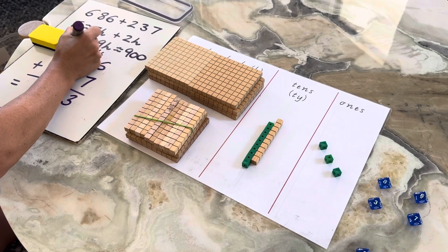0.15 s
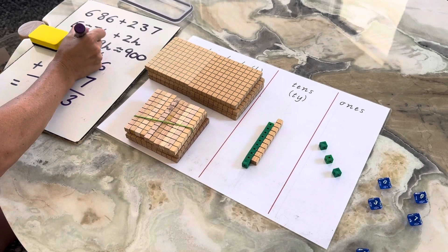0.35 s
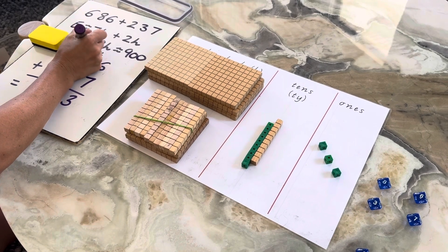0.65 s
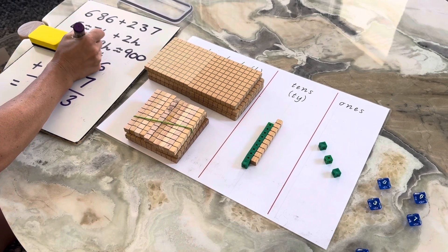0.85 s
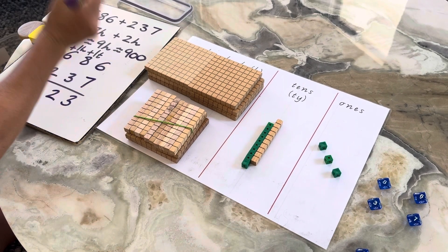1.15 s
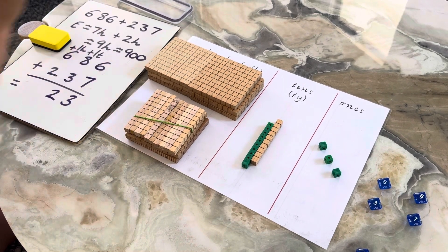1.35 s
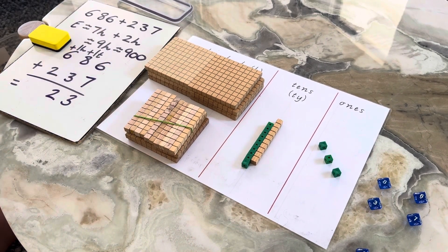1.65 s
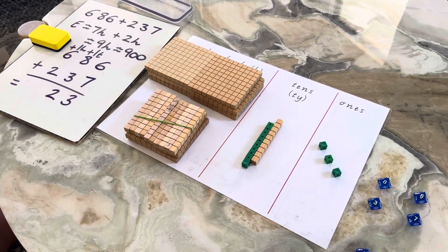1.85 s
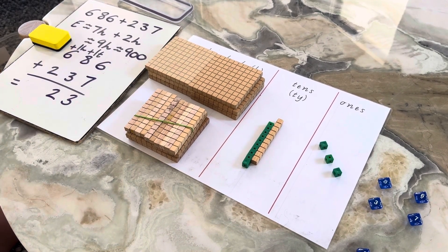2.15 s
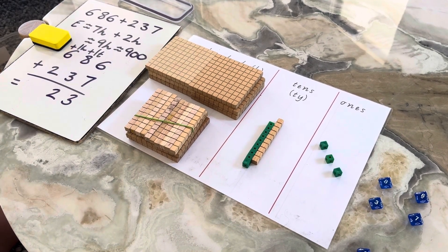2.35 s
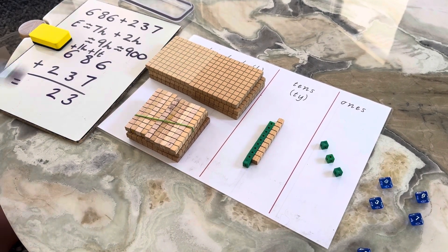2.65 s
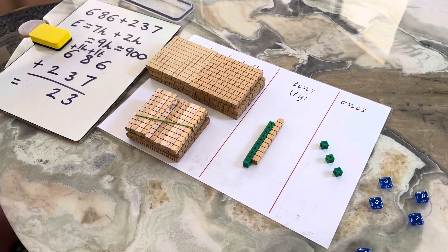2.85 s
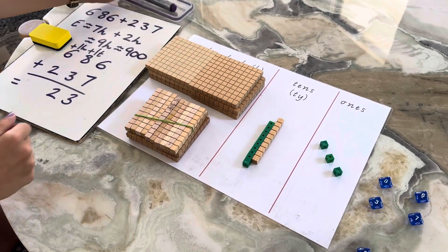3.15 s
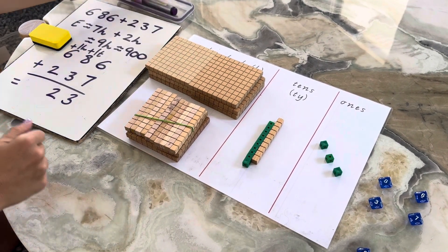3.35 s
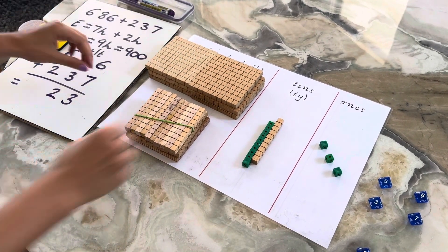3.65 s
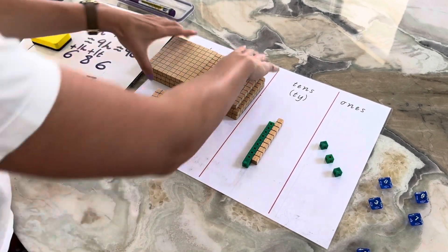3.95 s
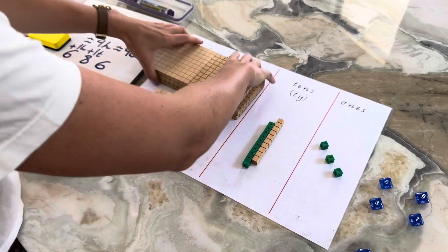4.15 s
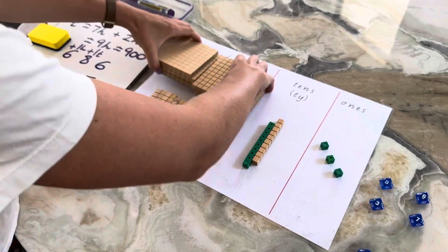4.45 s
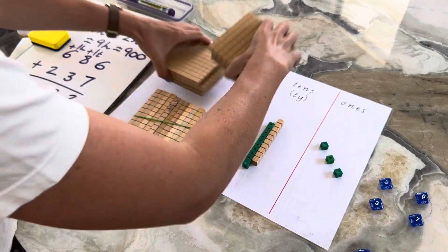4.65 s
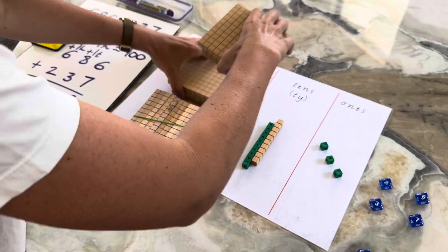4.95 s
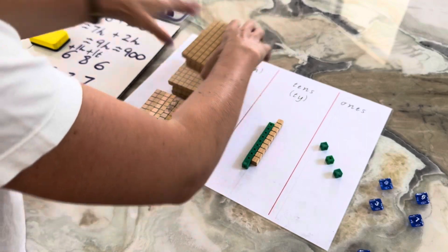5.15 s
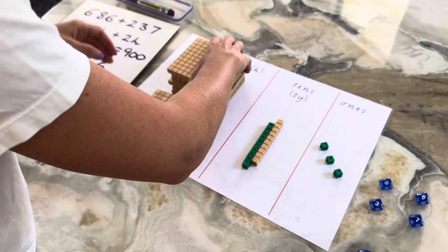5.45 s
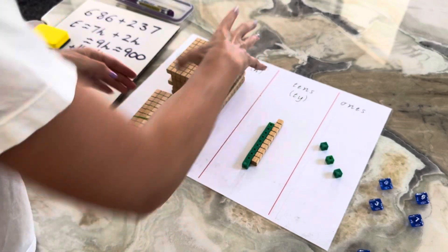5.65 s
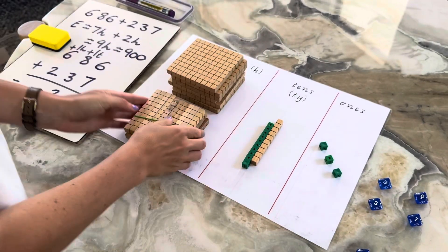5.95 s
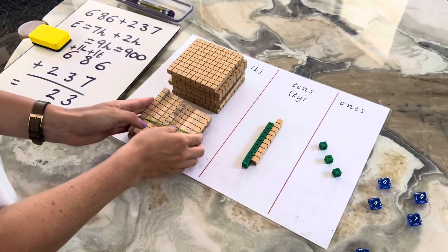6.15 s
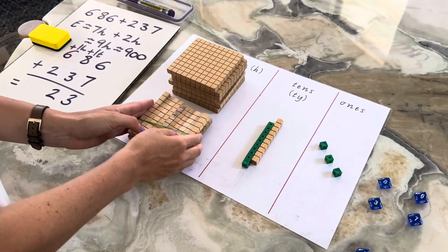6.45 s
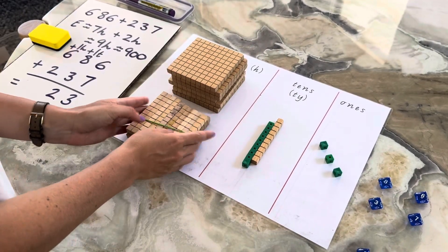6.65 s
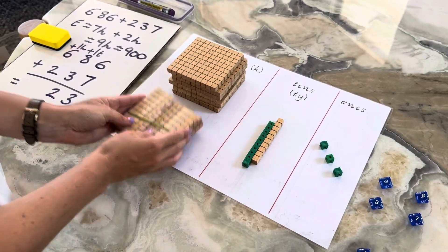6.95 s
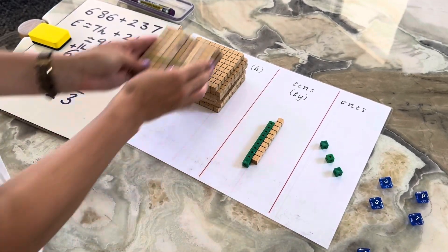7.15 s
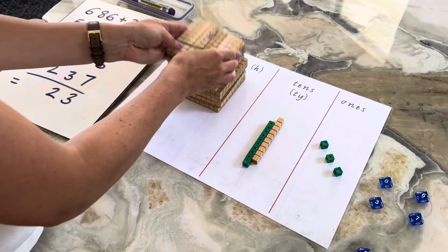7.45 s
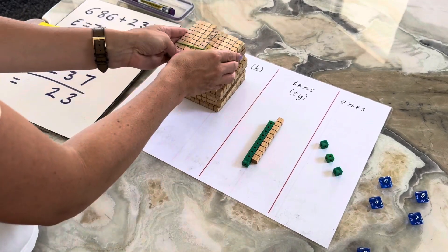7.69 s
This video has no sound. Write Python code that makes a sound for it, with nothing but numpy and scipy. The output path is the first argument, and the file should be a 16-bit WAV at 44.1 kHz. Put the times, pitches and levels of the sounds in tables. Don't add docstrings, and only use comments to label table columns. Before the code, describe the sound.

Low building rumble and soft hiss lie under small handling sounds at a stone-topped table. Light pen taps begin slightly left, growing into a clattering burst. Fingers rub wood and paper while blocks give short dry woody clacks and the table answers with low thumps. After a quieter pause with a couple of knocks, a stack lands in one hard, crisp clack with short room reverberation.

```python
import sys
import numpy as np
from scipy import signal
from scipy.fft import rfft, irfft
from scipy.io import wavfile

SR = 44100
rng = np.random.default_rng(int(sys.argv[2]) if len(sys.argv) > 2 else 0)


def waveform_to_disk(signal):
    frames = np.transpose(np.atleast_2d(signal))
    scaled = np.clip(frames, -1, 1) * 32767
    samples = np.round(scaled).astype(np.int16)
    wavfile.write(sys.argv[1], SR, samples)


def level_to_linear(level):
    exponent = np.asarray(level, float) / 20
    return 10 ** exponent


N = 344862

HZ = np.maximum(np.arange(N // 2 + 1) * SR / N, 1)
BAND_EDGES_HZ = 22 * 2 ** np.arange(0, 9.7, .4)

# frequency in Hz, level in dB per Hz.
FLOOR_SPECTRUM = [(18, -67), (30, -31.5), (47, -9.5), (70, 2), (124, -17.5), (199, -15.5), (374, -28.5),
                  (449, -24.5), (486, -35.5), (1220, -47), (1500, -44.5), (1630, -50), (5900, -54),
                  (6900, -47), (16000, -64.5)]
# frequency in Hz, likeness (1 = same, -1 = opposed).
FLOOR_LIKENESS = [(60, 1), (130, 0.73), (290, 0.86), (640, -0.29), (1410, -3.2), (3100, -1.4), (6820, 0.17),
                  (15000, -0.41)]
FLOOR_DB = -59.5
RUMBLE_HZ, RUMBLE_WIDTH_HZ, RUMBLE_DB = 64, 8.8, -64.5

# frequency in Hz, level in dB, t60 in seconds.
ROOM_DECAY = [(154.5, 16.5, 0.5), (500, 2.5, 0.7), (1150, 0, 0.69), (2380, -0.5, 0.6), (5170, -0.5, 0.52),
              (8500, -7, 0.4), (12000, -11.5, 0.167)]
# frequency in Hz, likeness (1 = same, -1 = opposed).
ECHO_LIKENESS = [(60, 0.97), (130, 1), (290, 0.74), (640, -0.086), (1410, 0.12), (3100, 0.024),
                 (6820, 0.15), (15000, -0.21)]
ROOM_DB, FIRST_ECHO_S = -5.5, 0.00072

# frequency in Hz, gain in dB.
PORT_DIP = [(7900, 0), (8500, -9), (10500, -11.5), (11300, 1)]
# frequency in Hz, lead of the left port in radians.
PORT_PHASE = [(250, .05), (1000, .1), (2500, .35), (4200, 1), (8300, 3.1), (11500, 1.6), (14000, 1),
              (16400, 1)]
# time in seconds, left over right in dB.
HAND_LEAN = [(1.9, 6), (2.3, 4.5), (3.1, 2.4), (4.4, 1.3), (7.5, .6)]

# frequency in Hz, level in dB, t60 in seconds.
SWAY_MODES = [(159, 6, 0.47), (128, -7, 0.28), (210, -4, .22), (249, -4, 0.2)]
# frequency in Hz, level in dB, t60 in seconds.
RING_MODES = [(355, 0, .4), (351.3, -7, .45), (345, -11, .2), (366, -11, .2)]
# frequency in Hz, level in dB, t60 in seconds.
OVERTONE_MODES = [(564, 1.5, 0.12), (618.6, -3.5, 0.22), (653, -2, 0.46), (923, -16.5, 0.35),
                  (1027, -10.5, 0.39), (1080, -13, 0.55)]
# frequency in Hz, level in dB, t60 in seconds.
THUD_MODES = [(306, -15.5, 0.01), (410, 3, 0.05), (544, 4.5, 0.041)]
# start in seconds, sway peak, ring and overtones in dB.
BLOWS = [(2.2, -75, -76.5, -64), (3.082, -55, -51, -44), (3.258, -64, -63, -62), (3.493, -48, -53.5, -70),
         (4.115, -45.5, -60.5, -65), (4.195, -52.5, -63.5, -65), (4.278, -49.5, -67.5, -62),
         (4.398, -55, -67, -61), (4.843, -40.5, -45.5, -42), (5.384, -37, -52.5, -41.5),
         (5.708, -57, -75, -58.5), (5.883, -44.5, -47.5, -59), (6.121, -66, -92, -76),
         (6.498, -51, -62.5, -68), (6.585, -54.5, -74, -67.5), (7.453, -49, -37, -43),
         (7.466, -22, -31, -32.5)]

# frequency in Hz, level in dB per Hz.
SKIN_SPECTRUM = [(3000, -19), (6000, -10), (8000, -1.5), (10000, -14), (13000, -5.5), (15300, -17.5),
                 (16200, -28)]
# frequency in Hz, level in dB per Hz.
SCUFF_SPECTRUM = [(400, -1.5), (900, -7.5), (1800, -3), (4000, -16), (8000, -14), (12000, -57.5)]
# start in seconds, hold in seconds,
# skin hiss in dB, wood and paper scuff in dB.
STROKES = [(0.417, 0.017, -78.5, -93), (0.454, 0.033, -111, -67), (0.712, 0.016, -78.5, -89),
           (1.763, 0.014, -78, -68), (2.027, 0.012, -76, -68.5), (2.18, 0.018, -73, -59.5),
           (2.506, .04, -82, -83), (2.626, 0.025, -82, -89), (3.115, 0.039, -123, -56.5),
           (3.274, 0.057, -102, -59.5), (3.5, 0.037, -80, -64), (3.69, 0.34, -89, -82.5),
           (4.072, 0.072, -73, -72), (4.206, 0.01, -58.5, -57.5), (4.262, 0.088, -78, -73),
           (4.951, 0.034, -71.5, -68.5), (5.399, 0.028, -90, -57), (5.517, 0.066, -72.5, -64),
           (5.86, 0.12, -74, -76.5), (6.04, 0.051, -77.5, -71), (6.247, 0.024, -79.5, -69.5),
           (6.52, 0.12, -83, -82), (6.648, 0.047, -75, -89), (6.76, 0.052, -82, -91),
           (7.256, 0.0067, -68, -63), (7.5, 0.17, -86, -54)]
RISE_DB_PER_S, SKIN_FALL_DB_PER_S, SCUFF_FALL_DB_PER_S = 697, 443, 135

# frequency in Hz, t60 in seconds.
HOLLOW_MODES = [(620, .012), (790, .01), (980, .008), (1200, .007)]
# frequency in Hz, t60 in seconds.
WOODY_MODES = [(1350, .006), (1600, .006), (1850, .006), (2100, .005)]
# frequency in Hz, t60 in seconds.
CLACK_MODES = [(2350, .005), (2650, .005), (2950, .004), (3350, .004)]
# frequency in Hz, t60 in seconds.
BRIGHT_MODES = [(3900, 0.00083), (4600, 0.0038), (5400, 0.00052), (6300, 0.0025), (7400, 0.004)]

# start in seconds, peak in dB at the middle pitch, brightness in dB per octave,
# focus in dB per octave squared, pitch of the ping in Hz.
PEN_CONTACTS = [(1.701, -54, -1.7, -2, 2760), (1.7753, -52.5, -3, -16, 2740),
                (1.8006, -48.5, 4, -5.5, 2770), (1.8763, -45.5, 3.0, -5, 1695), (1.9046, -71, 2, 0, 1860),
                (1.9332, -46.5, -2, -9.5, 2610), (2.0446, -47.5, 1.5, -13, 2550),
                (2.169, -72.5, 3, 13.5, 3940), (2.177, -40.5, 7, -1, 3300), (2.2003, -37, 2, 0.1, 3120),
                (2.4334, -64.5, 4.5, -1, 4700), (3.0843, -28.5, -1.5, -1, 2660), (3.0901, -34, -2, -7, 800),
                (3.1008, -31, -11, -12, 1980), (3.104, -39.5, -3.1, 4.5, 2760), (3.1213, -37, 0, -2, 840),
                (3.148, -41, -13, -35, 1600), (3.257, -38, 5.5, -7.5, 2270), (3.3569, -53, -1, 0, 1960),
                (3.4935, -43, 4, 2.3, 3980)]
BLOCK_KNOCKS = [(4.1949, -87, 15, 5.5, 1790), (4.3975, -43.5, -8.5, -4, 1780),
                (4.5209, -86.5, 8, 8.5, 4800), (4.8453, -33.5, -10, -9.5, 1750),
                (5.3829, -37, -1.2, 1, 2000), (5.3874, -47.5, -4, 3.5, 736), (5.8945, -60, -2.5, -1.5, 605),
                (6.0908, -55, 4, -7, 1880), (6.121, -53.5, 13.5, -3.5, 3810), (6.2555, -55, 7, -5.5, 2930),
                (6.5012, -34, 3.5, -8, 2480), (6.5859, -46, 2, -5.5, 2440), (6.6838, -60, 0.5, -3, 3070)]
ROD_SLAP = [(7.4524, -29.5, 2.9, -1), (7.4609, -27, 0.73, -3.5), (7.4649, -16.5, 5.5, -0.35),
            (7.4672, -26, 3.3, 1), (7.4695, -20.5, 1.2, 1)]
HAND_PATS = [(0.4394, -67.5, -12.5, -9.5), (3.479, -59, -4, 1.5), (4.1949, -57.5, -5.5, -1),
             (5.5194, -75, 2.5, 8.5), (5.6994, -66, -5.5, -1.5), (5.7494, -74, -7.5, 4),
             (6.6563, -67, 5, 0.5), (7.2589, -72.5, 0.5, 4)]
# contact in ms, share sent to the room in dB, edge tick in dB re bright modes.
TOUCH = [
    (0.65, 0, -3),
    (0.75, -1, -4.5),
    (1.2, -3, -4.5),
    (17.5, 4.5, -31),
]
# start in seconds, level in dB.
TICKS = [(1.8009, -54.5), (4.195, -43), (4.832, -64), (4.846, -55), (5.8405, -48.5), (5.8838, -37.5),
         (5.8965, -54), (3.0845, -40.5), (2.169, -39)]
MIDDLE_HZ = 2000
PING_DB, PING_T60_S = -3.0, .008
EDGE_S, EDGE_CUT_HZ = 0.0013, 7500


def rms_one(x):
    return x / np.sqrt(np.mean(x ** 2) + 1e-20)


def at_hz(points, hz, column=1):
    points = np.array(points)
    return np.interp(np.log(hz), np.log(points[:, 0]), points[:, column])


def coloured(x, spectrum):
    return rms_one(irfft(rfft(x) * level_to_linear(at_hz(spectrum, HZ)), N))


def add(track, s, sound):
    i = round(s * SR)
    track[i:i + len(sound)] += sound[:N - i]


def spread(mid, side, alike):
    alike = np.clip(alike, -1, 1)
    return np.sqrt(1 + alike) * mid + np.sqrt(1 - alike) * side * [[1], [-1]]


def background():
    mid, side = rfft(rng.standard_normal((2, N)))
    field = spread(mid, side, at_hz(FLOOR_LIKENESS, HZ))
    hiss = rms_one(irfft(field * level_to_linear(at_hz(FLOOR_SPECTRUM, HZ)), N))
    radius = np.exp(-np.pi * RUMBLE_WIDTH_HZ / SR)
    turn = 2 * np.pi * RUMBLE_HZ / SR
    resonance = [1, -2 * radius * np.cos(turn), radius ** 2]
    rumble = rms_one(signal.lfilter([1, 0, -1], resonance, rng.standard_normal(N)))
    floor = level_to_linear(FLOOR_DB) * hiss + level_to_linear(RUMBLE_DB) * rumble
    return floor * level_to_linear([[1.5], [-1.5]])


def bands(size):
    white = rng.standard_normal((2, 2, size))
    for k, (low, high) in enumerate(zip(BAND_EDGES_HZ, BAND_EDGES_HZ[1:])):
        band = signal.butter(2, [low, high], "band", fs=SR, output="sos")
        mid, side = signal.sosfilt(band, white[k % 2])
        yield np.sqrt(low * high), mid, side


def room(x):
    t = np.arange(int(.8 * SR)) / SR
    tail = np.zeros((2, len(t)))
    for hz, mid, side in bands(len(t)):
        fall_db = at_hz(ROOM_DECAY, hz) - 60 * t / at_hz(ROOM_DECAY, hz, column=2)
        tail += level_to_linear(fall_db) * spread(mid, side, at_hz(ECHO_LIKENESS, hz))
    tail *= 1 - np.exp(-np.maximum(t - FIRST_ECHO_S, 0) / 0.0013)
    tail /= np.sqrt(np.sum(tail ** 2) / 2)
    return level_to_linear(ROOM_DB) * signal.fftconvolve(x[None], tail, axes=1)[:, :N]


def ports(diffuse):
    left, right = rfft(diffuse)
    mid = (left + right) / 2 * level_to_linear(at_hz(PORT_DIP, HZ))
    side = (left - right) / 2
    return irfft(np.array([mid + side, mid - side]), N)


def table(modes, push_s):
    t = np.arange(SR // 2) / SR
    ringing = np.zeros(len(t))
    for hz, db, t60 in modes:
        level_db = db + 2.0 * rng.standard_normal()
        ringing += level_to_linear(level_db - 60 * t / t60) * np.sin(2 * np.pi * hz * t)
    return ringing * (1 - np.exp(-t / push_s))


def table_top():
    top = np.zeros(N)
    for s, sway_db, ring_db, over_db in BLOWS:
        add(top, s, level_to_linear(sway_db - 10) * table(SWAY_MODES, push_s=0.0033))
        add(top, s, level_to_linear(ring_db + 7.5) * table(RING_MODES, push_s=0.019))
        add(top, s, level_to_linear(over_db - 7) * table(OVERTONE_MODES, push_s=0.0016))
        add(top, s, level_to_linear(sway_db - 15) * table(THUD_MODES, push_s=0.006))
    return top


def rubs():
    t = np.arange(N) / SR
    skin, scuff = np.zeros((2, N))
    for s, hold_s, skin_db, scuff_db in STROKES:
        rise_db = RISE_DB_PER_S * np.maximum(s - t, 0)
        late = np.maximum(t - s - hold_s, 0)
        skin += level_to_linear(skin_db - rise_db - SKIN_FALL_DB_PER_S * late)
        scuff += level_to_linear(scuff_db - 5.5 - rise_db - SCUFF_FALL_DB_PER_S * late)
    catches = np.minimum(rng.exponential(1, (2, N)), 4)
    grains = rng.standard_normal((2, N)) * level_to_linear(2 * catches)
    return skin * coloured(grains[0], SKIN_SPECTRUM) + scuff * coloured(grains[1], SCUFF_SPECTRUM)


def clack(modes, contact_ms, chance):
    t = np.arange(4000) / SR
    phase = t * 1000 / contact_ms
    contact = chance[20:] * np.sqrt(phase) * np.exp(-phase)
    contact[0] += 6.5
    strength, shift = level_to_linear(2 * chance[:10]), 1 + .04 * chance[10:20]
    ringing = np.zeros(len(t))
    for k, (hz, t60) in enumerate(modes):
        ringing += strength[k] * level_to_linear(-60 * t / t60) * np.sin(2 * np.pi * hz * shift[k] * t)
    span_hz = [modes[0][0] * 0.95, modes[-1][0] * 1.047]
    span = signal.butter(2, span_hz, "band", fs=SR, output="sos")
    sound = signal.sosfilt(span, signal.fftconvolve(contact, ringing)[:len(t)])
    return sound / np.abs(sound).max()


def knocks():
    air, echo = np.zeros((2, N))
    edge = signal.butter(4, 7500, "high", fs=SR, output="sos")
    face = np.vstack([edge, signal.butter(2, EDGE_CUT_HZ, fs=SR, output="sos")])
    t = np.arange(4000) / SR
    fading = np.exp(-t / EDGE_S)
    groups = [HOLLOW_MODES, WOODY_MODES, CLACK_MODES, BRIGHT_MODES]
    centres_hz = np.array([np.sqrt(modes[0][0] * modes[-1][0]) for modes in groups])
    octaves = np.log2(centres_hz / MIDDLE_HZ)
    kinds = [PEN_CONTACTS, BLOCK_KNOCKS, ROD_SLAP, HAND_PATS]
    for rows, (contact_ms, send_db, edge_db) in zip(kinds, TOUCH):
        for s, db, tilt, focus, *ping in rows:
            chance = rng.standard_normal((len(groups), 4020))
            gains = level_to_linear(db + tilt * octaves + focus * octaves ** 2)
            tick = signal.sosfilt(face, rng.standard_normal(4000) * fading)
            sound = level_to_linear(edge_db) * gains[-1] * tick
            for gain, modes, luck in zip(gains, groups, chance):
                sound += gain * clack(modes, contact_ms, luck)
            for hz in ping:
                level = level_to_linear(PING_DB) * np.interp(np.log2(hz / MIDDLE_HZ), octaves, gains)
                sound += level * level_to_linear(-60 * t / PING_T60_S) * np.sin(2 * np.pi * hz * t)
            add(air, s + 0.00065, sound)
            add(echo, s + .0006, level_to_linear(send_db) * sound)
    for s, db in TICKS:
        add(air, s, level_to_linear(db) * signal.sosfilt(edge, rng.standard_normal(4000) * fading))
    return air, echo


def scene():
    air, echo = knocks()
    sliding, top = rubs(), table_top()
    near = air + sliding + top
    right = irfft(rfft(near) * np.exp(-1j * at_hz(PORT_PHASE, HZ)), N)
    lean = level_to_linear(np.interp(np.arange(N) / SR, *np.transpose(HAND_LEAN)) / 2)
    feed = echo + sliding + .12 * top
    return np.array([near * lean, right / lean]) + ports(room(feed) + background())


def roll_off(x):
    return signal.sosfilt(signal.butter(12, 16820, fs=SR, output="sos"), x)


def record(dry):
    bass_cut = signal.butter(2, 40, "high", fs=SR, output="sos")
    mix = signal.sosfilt(bass_cut, dry)
    return roll_off(mix)


dry = scene()
out = record(dry)
waveform_to_disk(out)
```